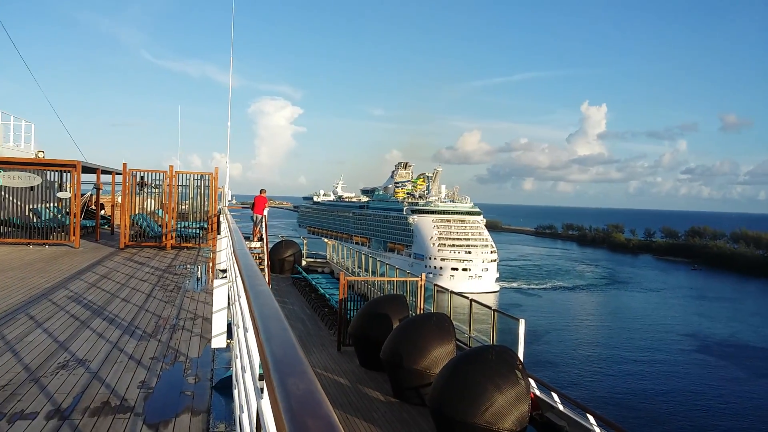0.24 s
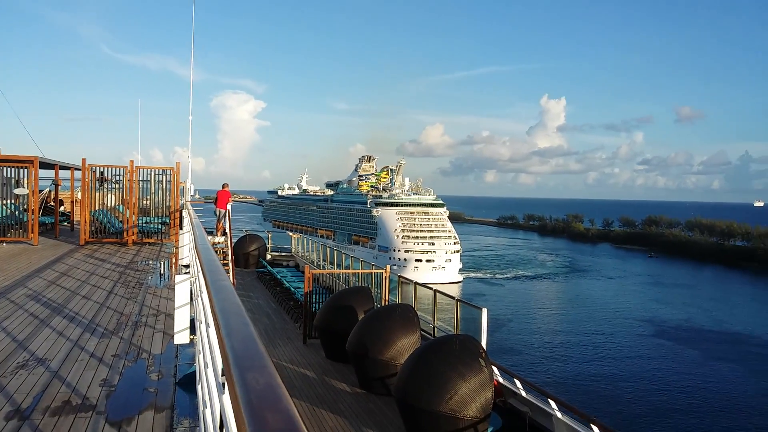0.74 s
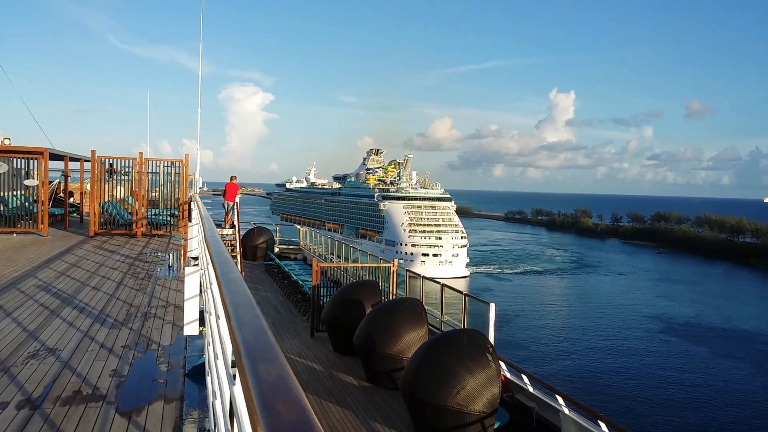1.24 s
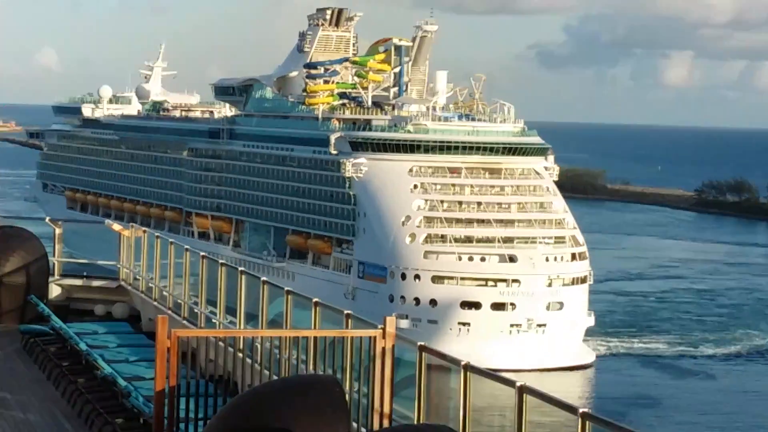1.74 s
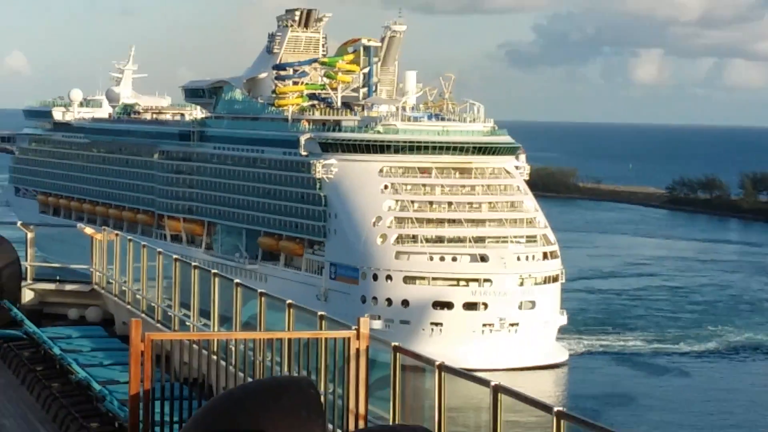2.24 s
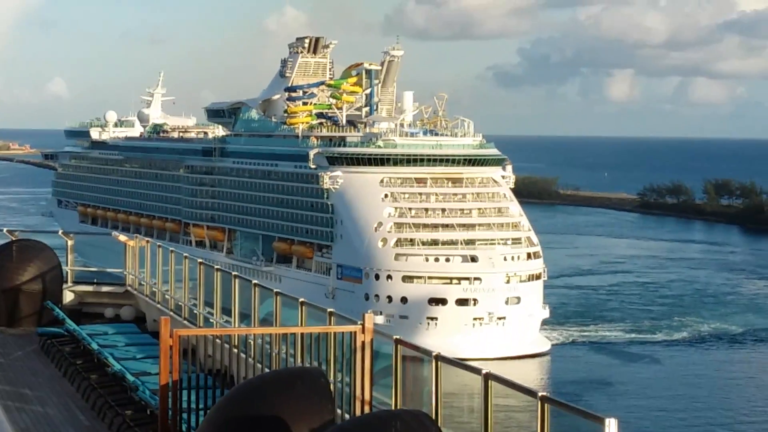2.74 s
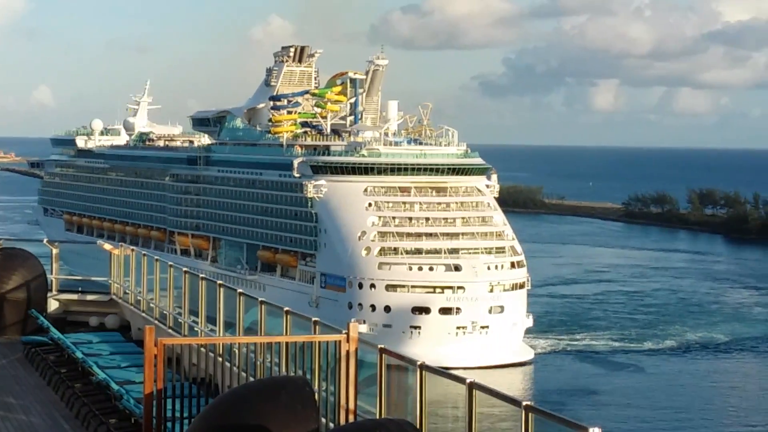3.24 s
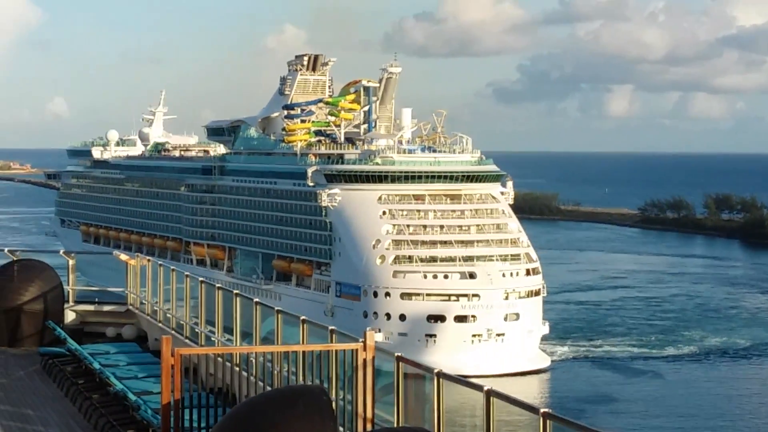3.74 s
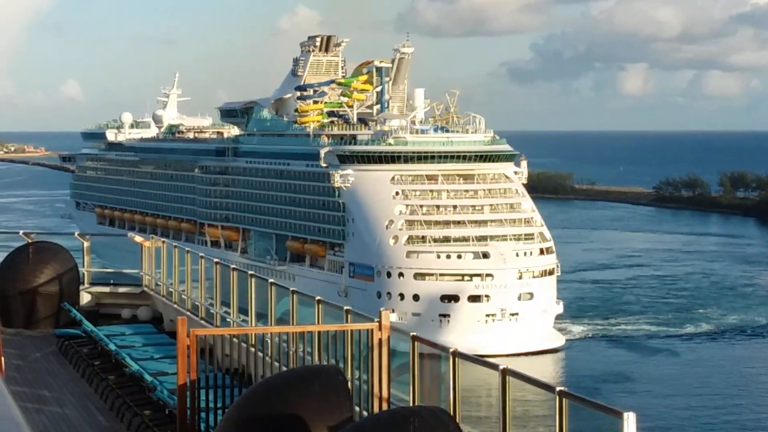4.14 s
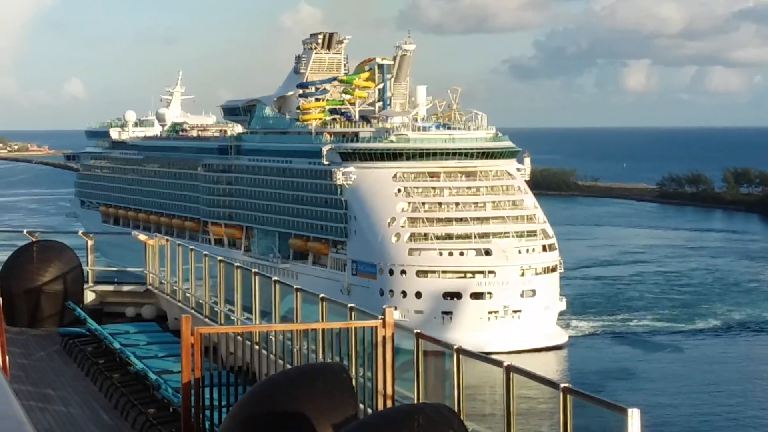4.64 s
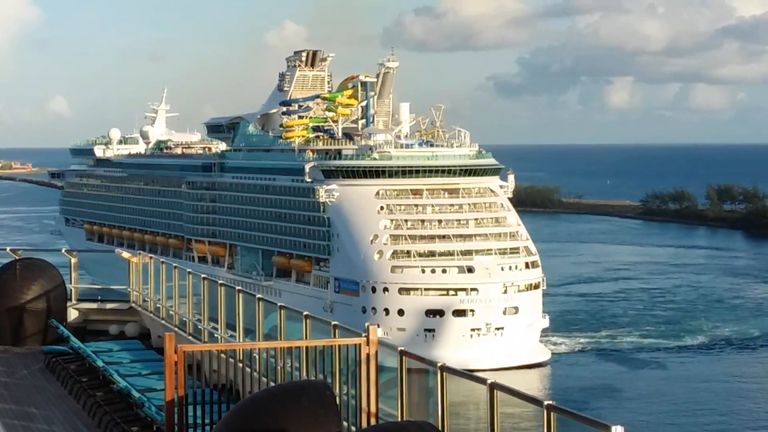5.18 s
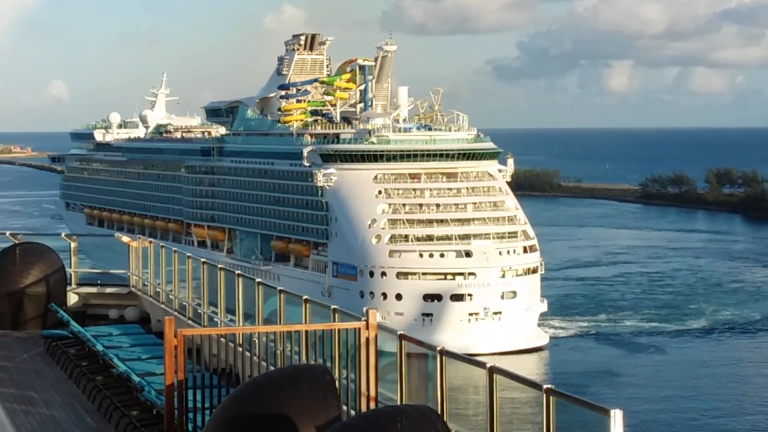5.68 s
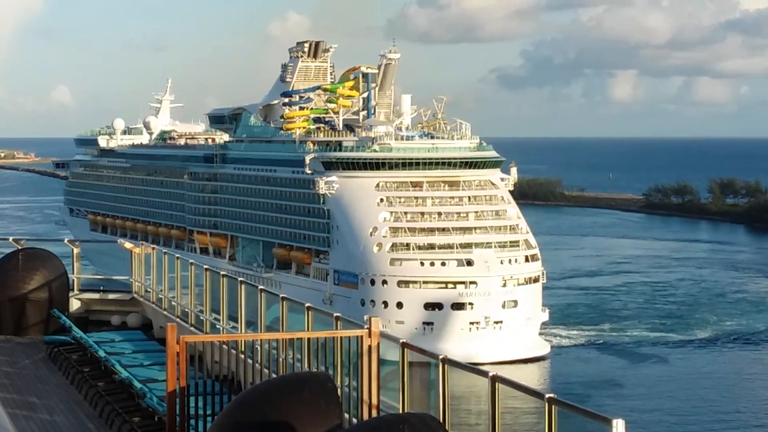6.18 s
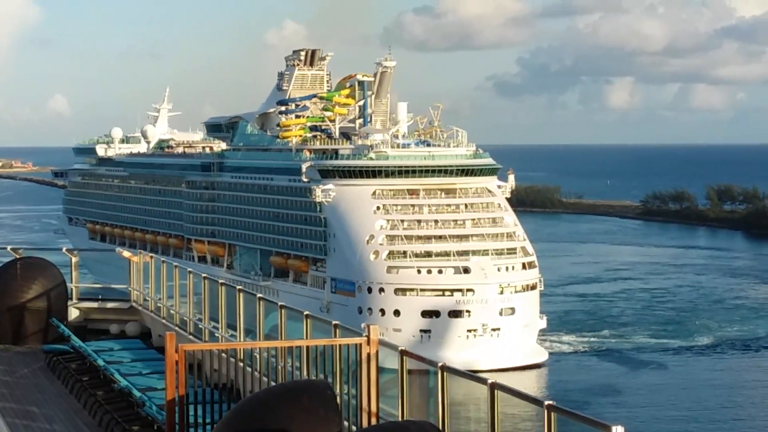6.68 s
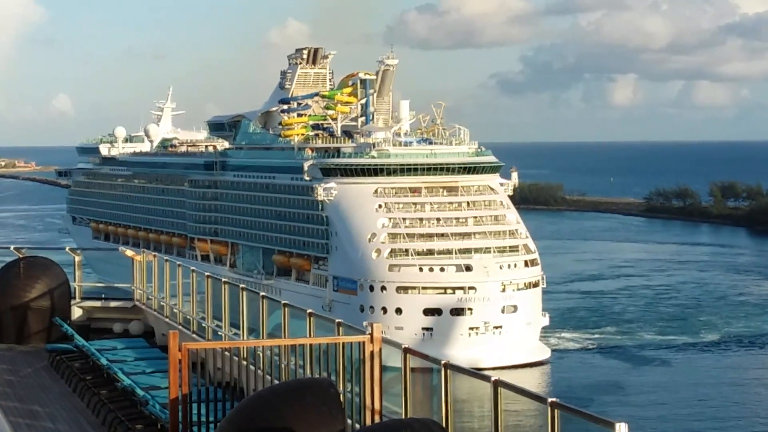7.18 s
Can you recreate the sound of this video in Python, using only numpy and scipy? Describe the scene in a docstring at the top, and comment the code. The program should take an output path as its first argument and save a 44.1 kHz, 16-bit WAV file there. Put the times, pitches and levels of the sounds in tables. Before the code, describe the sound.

Outdoors on a ship's deck, heard through a small hand-held stereo microphone. A low diesel idle throbs beneath a steady dark roar of fans and wash and wavering pump and generator hums, the bass thinned at first. Gusty wind brushes the left side, with a puff near 1.2 s and a tiny bright tick at 1.4. From about 1 s the engine climbs in pitch and strength; at 1.55 the bass suddenly opens full. Around 2.7 the revs peak, drop slightly and hold as a wavering drone. Wind thumps the left side at 4 to 4.5 s with brief narrow hisses, then again near 5.5. Faint railing tones sing around 5 s. From 6.1 the engine slows and fades toward idle while hard, blunt gusts batter the left until the end, with a lower faint whistle. At about 6.7 the bass thins again.

```python
"""A large ship's slow diesel revs up, drones, then slows: wavering multiples of a governed cycle rate.
Pumps and generators hum as tones; fans and wash roar as shaped noise. Heard by a hand-held camera on deck:
wind buffets and thumps the left microphone port, with brief hisses, and sings over a railing as tones.
A fingertip taps once and a finger shades the left port for a while. The camera's wind filter
lets the bass through for five seconds, then cuts it again."""
import sys
import numpy as np
from scipy import signal
from scipy.fft import rfft, irfft, next_fast_len
from scipy.io import wavfile
from scipy.ndimage import map_coordinates

SR = 44100
rng = np.random.default_rng(int(sys.argv[2]) if len(sys.argv) > 2 else 0)


def linear_from_db(decibels):
    """Turn decibels (scalar or array-like) into linear amplitude factors; 0 gives 1."""
    return 10 ** (np.asarray(decibels, float) / 20)


def dump(signal):
    """Clip the signal to [-1, 1] and save it as 16-bit WAV at the path in sys.argv[1]."""
    limited = np.clip(np.atleast_2d(signal).T, -1, 1)
    pcm = np.round(limited * 32767).astype(np.int16)
    wavfile.write(sys.argv[1], SR, pcm)


N = 327033
T = np.arange(N) / SR


def along(points, hz, column=1):
    """A column of a table read on a log frequency axis."""
    table = np.transpose(points)
    return np.interp(np.log(hz + 1), np.log(table[0] + 1), table[column])


def wobble(knots_per_s):
    """A smooth random curve through normally distributed knots."""
    coarse_s = T[::32]
    knots = rng.standard_normal(int(N * knots_per_s / SR) + 4)
    return np.interp(T, coarse_s, map_coordinates(knots, [coarse_s * knots_per_s]))


def filtered(x, response):
    """x times a response of frequency; mirrored ends keep the edges smooth."""
    pad = 4096
    wide = np.pad(x, [(0, 0)] * (x.ndim - 1) + [(pad, pad)], "reflect")
    m = next_fast_len(wide.shape[-1])
    spectrum = rfft(wide, m) * response(np.fft.rfftfreq(m, 1 / SR))
    return irfft(spectrum, m)[..., pad:pad + N]


def noise(density, channels):
    """Gaussian noise whose density follows a (frequency [Hz], density [dB per Hz]) table."""
    white = rng.standard_normal((channels, N)) * np.sqrt(SR / 2)
    return filtered(white, lambda hz: linear_from_db(along(density, hz)))


def between(span_s, fade_s):
    """1 inside the span, 0 outside, with smooth fades."""
    inside_s = np.minimum(T - span_s[0], span_s[1] - T)
    return np.sin(np.pi / 2 * np.clip(inside_s / fade_s + .5, 0, 1)) ** 2


def bell(s, length_s):
    """Gaussian swell, length_s between its 1/e points."""
    return np.exp(-(2 * (T - s) / length_s) ** 2)


def speed():
    """Cycle rate [Hz]: climbs ever slower, is caught by the governor, later eases back to idle."""
    idle_hz, cruise_hz, aim_hz = 13.7, 17.12, 19  # full throttle pulls toward aim_hz
    throttle_s, governor_s = 1.02, 2.65
    pull_s, settle_s = 1.47, .15  # time constants of climb and overshoot
    slow_from_s, slow_to_s = 6.12, 7.5
    pulling_s = np.clip(T, throttle_s, governor_s) - throttle_s
    climb = aim_hz - (aim_hz - idle_hz) * np.exp(-pulling_s / pull_s)
    overshoot = np.exp(-np.clip(T - governor_s, 0, None) / settle_s)
    held = cruise_hz + (climb - cruise_hz) * overshoot
    progress = np.clip((T - slow_from_s) / (slow_to_s - slow_from_s), 0, 1)
    return held - (held - idle_hz) * np.sin(np.pi / 2 * progress) ** 2


def engine(unsteady_db=1.6, drift_rad=.2):
    """Multiples of the engine cycle; the air on the long path makes each waver in level and phase."""
    # engine gain: (time [s], level [dB])
    engine_gain = [(0, -5.5), (1, -5), (1.5, 0.5), (3, 1.5), (4.5, -1), (6.3, 1.5), (6.9, -5.5),
                   (7.42, -13)]
    # firing pattern: (multiple of cycle rate, peak before gain and resonances [dB], extra at full load [dB])
    firing_pattern = [(4, -40, 0), (5, -37, 2), (6, -42, 0), (7, -37, 0), (8, -38, 0), (9, -44, 0),
                      (10, -41, 0), (11, -34, -3), (12, -30, 3), (13, -31, 4), (14, -41, 0), (15, -41, 4),
                      (16, -39, 14), (17, -37, 2), (18, -45, 0), (20, -42, 0), (22, -40, 0), (24, -47, 0),
                      (26, -45, 0), (27, -44, 0)]
    # exhaust resonances that multiples pass through: (centre [Hz], width [Hz], lift [dB])
    exhaust_resonances = [(69, 9, 10), (137, 10, 6), (151, 10, 9), (165, 8, 5), (186, 12, 9),
                          (197, 12, -10), (212, 18, 8), (265, 30, 2)]
    rate_hz = speed()
    load = between((1.4, 2.5), fade_s=.4)  # full load while speeding up
    cycle_phase = 2 * np.pi * np.cumsum(rate_hz) / SR
    out = 0
    for k, db, load_db in firing_pattern:
        lift_db = sum(g / (1 + (2 * (k * rate_hz - c) / w) ** 2) for c, w, g in exhaust_resonances)
        size = linear_from_db(db + load * load_db + lift_db + unsteady_db * wobble(4))
        phase = k * cycle_phase + rng.uniform(0, 2 * np.pi) + drift_rad * wobble(7)
        out = out + size * np.sin(phase)
    return linear_from_db(np.interp(T, *np.transpose(engine_gain))) * out


def hum():
    """Tones of pumps and generators, wavering in level and phase."""
    # steady tones before wavering: (frequency [Hz], level [dB rms])
    hum_tones = [(97, -41), (105, -41), (150, -43), (261, -39), (339, -41), (376, -44), (470, -49)]
    out = 0
    for hz, db in hum_tones:
        size = np.sqrt(2) * linear_from_db(db + 3.5 * wobble(4))
        out = out + size * np.sin(2 * np.pi * hz * T + .8 * wobble(4))
    return out


def roar():
    """Broad noise of fans and wash from all around, most alike at both ports in the bass."""
    # roar before its overall gain: (frequency [Hz], density [dB per Hz])
    roar_density = [(20, -90.5), (35, -69.5), (55, -52), (100, -53.5), (165, -54.5), (230, -52), (350, -55),
                    (480, -63), (900, -63.5), (1500, -72.5), (2200, -78.5), (3300, -88), (4000, -98),
                    (5500, -107), (9000, -125)]
    # left-right likeness: (frequency [Hz], correlation)
    likeness = [(30, 0.7), (70, 0.94), (220, 0.99), (500, 0.95), (900, 0.76), (1700, 0.11), (3000, 0.2),
                (6000, .02)]

    def mid_side(hz):
        angle = np.arccos(np.clip(along(likeness, hz), -1, 1)) / 2
        return np.array([np.cos(angle), np.sin(angle)])

    mid, side = filtered(noise(roar_density, channels=2), mid_side)
    return linear_from_db(2.02 + 0.58 * wobble(2.4)) * np.array([mid + side, mid - side])


def gusts(calm_db=-37):
    """Strength of the wind at the port: bell-shaped gusts over a calm, summed in power."""
    # gusts on the left port: (time [s], length [s], level [dB rms])
    gust_bells = [(0.298, 1.6, -24.5), (1.163, 0.12, -15.5), (2.55, 0.17, -25.5), (4.0, .14, -22.5),
                  (4.3, 0.65, -21.5), (5.53, 0.29, -25.5), (6.173, .12, -14.5), (6.312, 0.074, -18.5),
                  (6.42, .07, -16), (6.53, .12, -17), (7.1, 1.4, -20.5)]
    power = sum((linear_from_db(db) * bell(s, length_s)) ** 2 for s, length_s, db in gust_bells)
    return np.sqrt(linear_from_db(calm_db) ** 2 + power)


def eddies(strength, count=104):
    """Small random thumps scaled by the wind of the moment: rows (time [s], level [dB], pitch [Hz])."""
    per_s, over_wind_db, spread_db = 14, 2, 4.5
    centre_hz, pitch_spread = 129, 0.37  # spread in log pitch
    late, size, pitch = rng.standard_normal((count, 3)).T
    s = (np.arange(count) + np.abs(late)) / per_s
    db = 20 * np.log10(np.interp(s, T, strength)) + over_wind_db + spread_db * size
    return list(zip(s, db, centre_hz * np.exp(pitch_spread * pitch)))


def wind(leak_db=-18):
    """Lumpy buffeting and single thumps of one or two cycles; little reaches the sheltered port."""
    # buffeting colour, overall level set by the gusts: (frequency [Hz], relative density [dB])
    buffet_colour = [(20, -39), (33, -22.5), (48, -3), (80, 5), (150, -2.5), (300, -16), (600, -20),
                     (1200, -53.5), (2500, -120)]
    # hardest eddies bursting on the left port: (time [s], nominal peak [dB], pitch [Hz])
    hard_thumps = [(3.967, -7, 150), (4.006, -5, 163), (4.204, -6, 182), (4.45, -9, 107),
                   (5.477, -11.5, 188), (6.013, -8, 119), (6.214, -8.5, 200), (6.297, -7.5, 117),
                   (6.319, -8, 110), (6.411, -5.5, 123), (6.435, -1.5, 188), (6.488, -9.5, 110),
                   (6.537, -6.5, 151), (6.561, -9, 94), (6.675, -5, 380), (6.699, -8.5, 187),
                   (6.727, -9.5, 139), (6.78, -8, 192), (6.923, -4.5, 186), (6.989, -5, 193),
                   (7.014, -3.5, 88), (7.088, -8.5, 170), (7.327, -10.5, 118), (7.39, -11.5, 320)]
    lumps = noise(buffet_colour, channels=1)[0] * linear_from_db(4 * wobble(25))
    strength = gusts()
    left = strength * lumps / np.std(lumps)
    for s, db, hz in eddies(strength) + list(hard_thumps):
        u, v = rng.uniform(0, 2 * np.pi, 2)
        near = slice(max(round((s - .04) * SR), 0), round((s + .04) * SR))
        cycles = (T[near] - s) * hz
        # a low push with a sharper edge riding on it
        push = np.exp(-(cycles / 0.73) ** 2) * np.sin(2 * np.pi * cycles + u)
        edge = .4 * np.exp(-(cycles / .2) ** 2) * np.sin(2 * np.pi * 2.7 * cycles + v)
        left[near] += linear_from_db(db) * (push + edge)
    return left * linear_from_db([[0], [leak_db]])


def swish():
    """Brief breaths of narrow hiss in the left port's resonance."""
    # swells of the hiss: (time [s], length [s], level [dB rms])
    swish_swells = [(1.17, .06, -51.5), (1.682, 0.045, -55), (3.248, 0.12, -55), (3.944, 0.055, -54),
                    (4.211, 0.076, -48)]
    resonance = [(4000, -62), (4900, -8), (5150, 0.0), (5350, -10.5), (6400, -60)]  # (Hz, relative dB)
    air = noise(resonance, channels=1)[0]
    swells = sum(linear_from_db(db) * bell(s, length_s) for s, length_s, db in swish_swells)
    return swells * air / np.std(air) * [[1], [0]]


def tick():
    """A fingertip touches the camera body: a tiny bright decaying tone, mostly on the left."""
    start_s, peak_db, hz, decay_60db_s = 1.364, -44, 7000, .004
    age_s = np.clip(T - start_s, 0, 1)
    decay = linear_from_db(peak_db - 60 * age_s / decay_60db_s) * (age_s > 0)
    return decay * np.sin(2 * np.pi * hz * age_s) * linear_from_db([[0], [-8]])


def whistle():
    """Eddies shed from a railing sing a slightly breathy tone in swells."""
    # swells before the port response: (time [s], length [s], pitch [Hz], level [dB rms], left-right [dB])
    whistle_swells = [(4.93, .12, 875, -45, -3), (5.15, .3, 1152, -47, 7), (5.24, .1, 1152, -43, 3),
                      (6.3, .25, 770, -44, -1.5), (6.55, .08, 770, -46, -1.5), (6.8, .08, 770, -38, -1.5),
                      (6.89, .1, 770, -38, -1.5), (6.85, 1.2, 770, -44, -1.5)]
    out, waver_rad = 0, 0.44 * wobble(30)
    for s, length_s, hz, db, pan_db in whistle_swells:
        swell = linear_from_db(db + np.array([[pan_db / 2], [-pan_db / 2]])) * bell(s, length_s)
        out = out + np.sqrt(2) * swell * np.sin(2 * np.pi * hz * T + waver_rad)
    return out


def ports(distant):
    """The left port hears early and coloured; a finger near it changes the colour for a while."""
    # left port against the right: (frequency [Hz], open [dB], shaded by a finger [dB])
    port_response = [(60, 3, 3), (100, -0.5, -1), (520, 0, 1), (950, -2.5, -1.5), (1390, -5.5, -2.5),
                     (1810, 0, 4.5), (2480, -0.5, -3.3), (3520, 4, 2), (4090, 11.5, 10.5), (4930, 19, 19.5),
                     (5800, 13.5, 15), (6950, 9, 10.5), (9000, 4, 2)]
    lead_samples = 11.9
    left, right = distant

    def left_port(hz):
        early = np.exp(2j * np.pi * hz * lead_samples / SR)
        return early * linear_from_db([along(port_response, hz, column) for column in (1, 2)])

    bare, shaded = filtered(left, left_port)
    finger = between((1, 2.55), fade_s=.08)
    return np.array([bare + finger * (shaded - bare), right])


def scene():
    """Distant sounds pass the port response; wind, swish and tick act on the ports directly."""
    distant = engine() + hum() + roar() + whistle()
    return ports(distant) + wind() + swish() + tick()


def wind_filter(dry):
    """A bass cut against wind, crossfaded to the full sound and back."""
    # bass let through, per channel left, right: (from [s], to [s])
    bass_open = [(1.555, 6.735), (1.555, 6.657)]
    # cut while the filter is on: (frequency [Hz], gain [dB])
    bass_cut = [(30, -11.5), (120, -8), (220, -7), (320, -4), (450, -4), (700, -0.5)]
    cut = filtered(dry, lambda hz: linear_from_db(along(bass_cut, hz)))
    is_open = np.array([between(span_s, fade_s=0.0049) for span_s in bass_open])
    return cut + is_open * (dry - cut)


def overload(x, ceiling=.8):
    """The input stage softly rounds off the hardest thumps."""
    return x / (1 + np.abs(x / ceiling) ** 6) ** (1 / 6)


def hiss():
    """Steady microphone noise, independent per channel."""
    # microphone hiss: (frequency [Hz], density [dB per Hz])
    hiss_density = [(3000, -117), (9000, -118), (12000, -122), (15000, -128)]
    return noise(hiss_density, channels=2)


def top_cut(x):
    """Nothing passes above the cut-off."""
    return signal.sosfilt(signal.butter(12, 15750, fs=SR, output="sos"), x)


def record(dry):
    """Switched wind filter, soft overload, then microphone hiss."""
    mix = overload(wind_filter(dry)) + hiss()
    return top_cut(mix)


dry = scene()
out = record(dry)
dump(out)
```